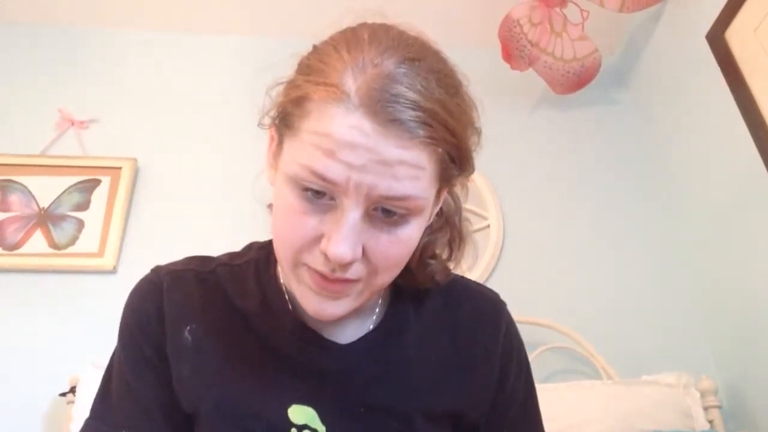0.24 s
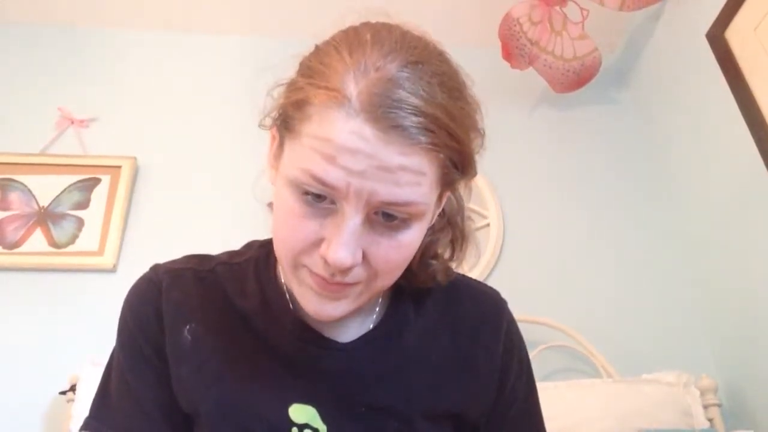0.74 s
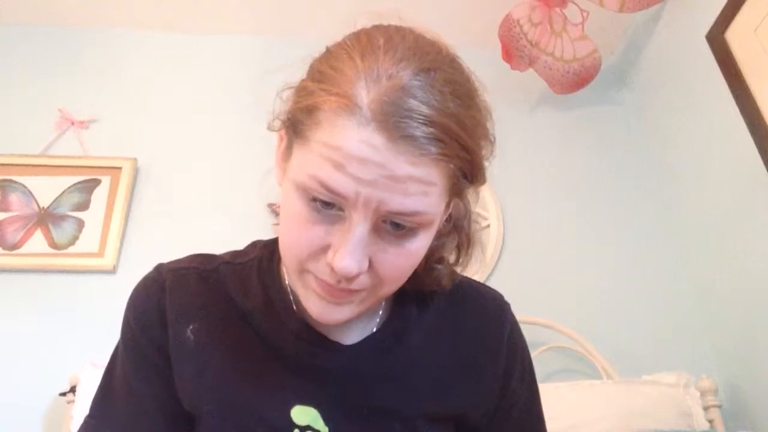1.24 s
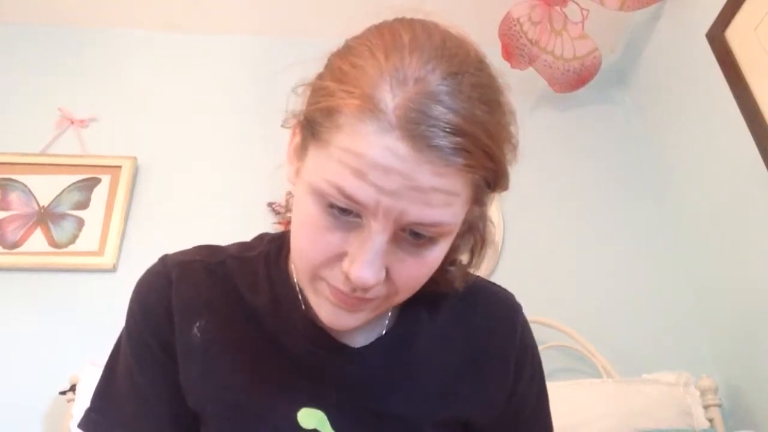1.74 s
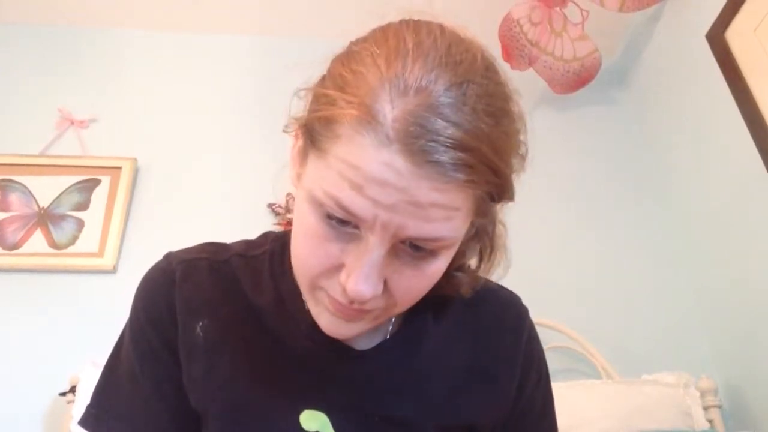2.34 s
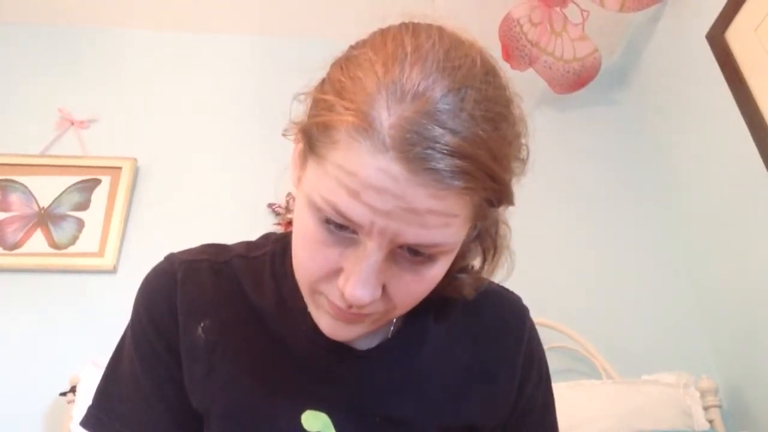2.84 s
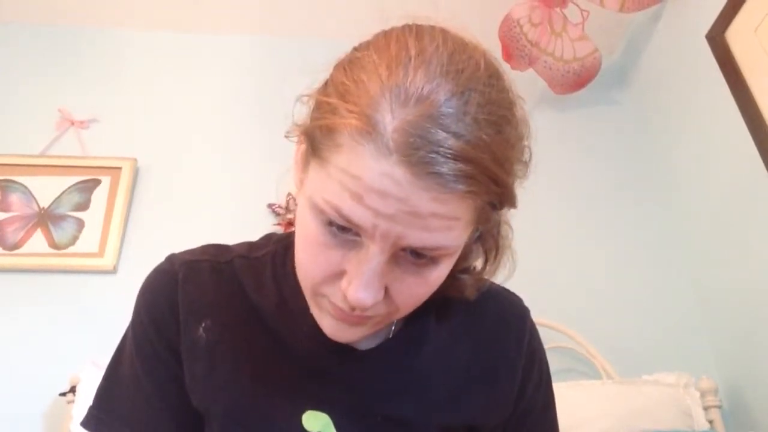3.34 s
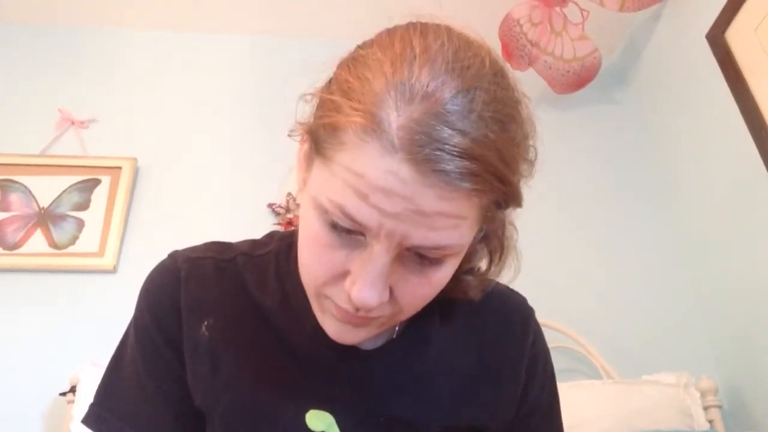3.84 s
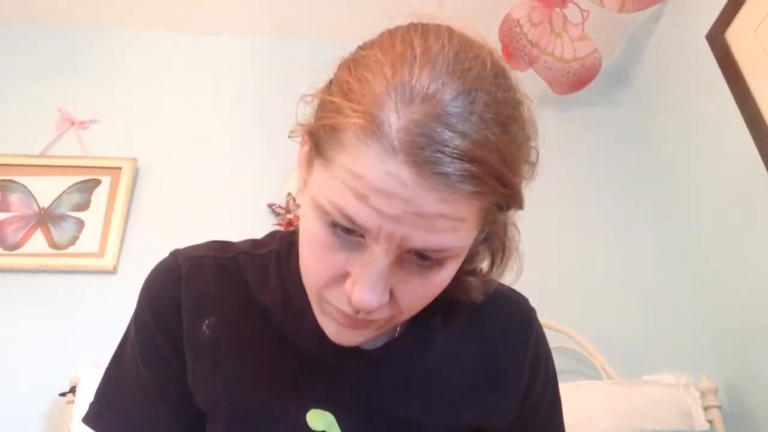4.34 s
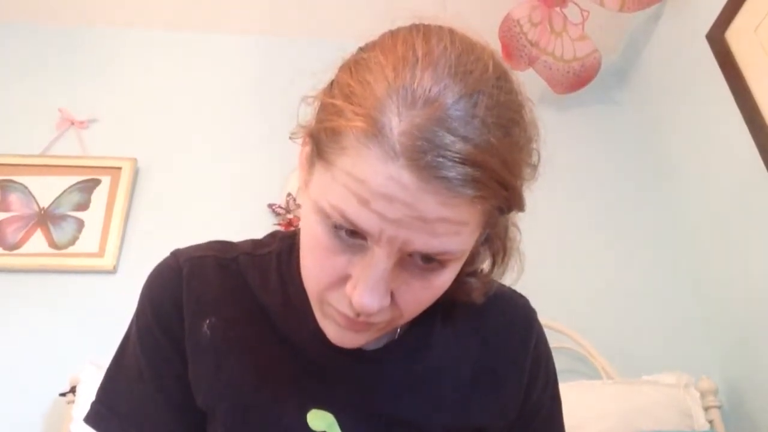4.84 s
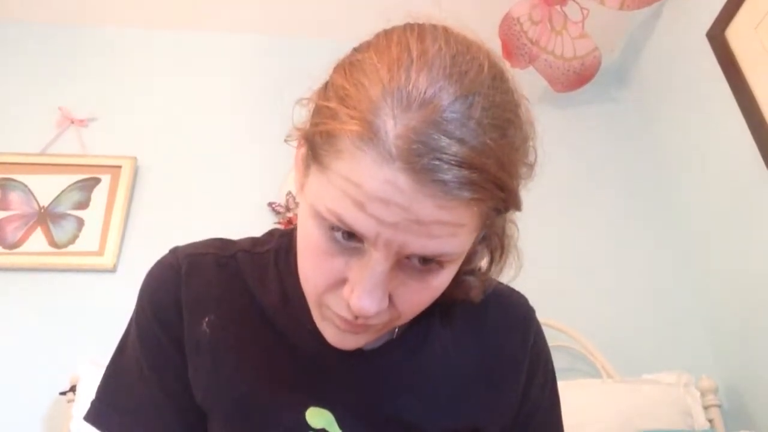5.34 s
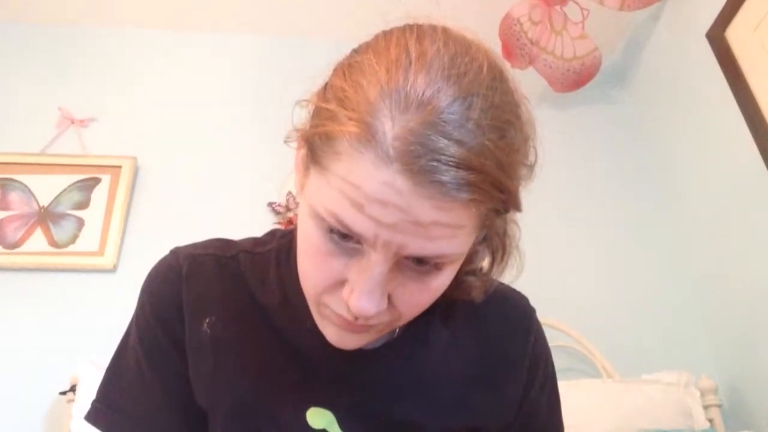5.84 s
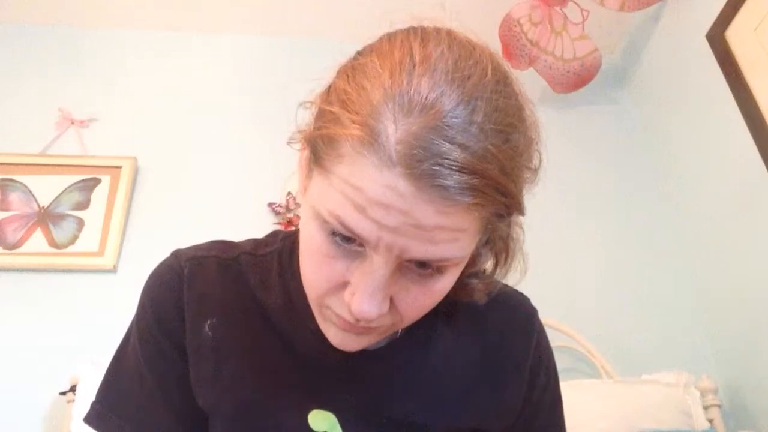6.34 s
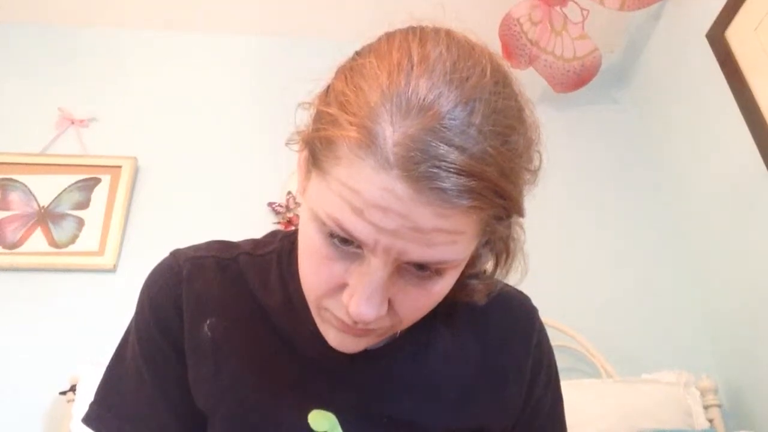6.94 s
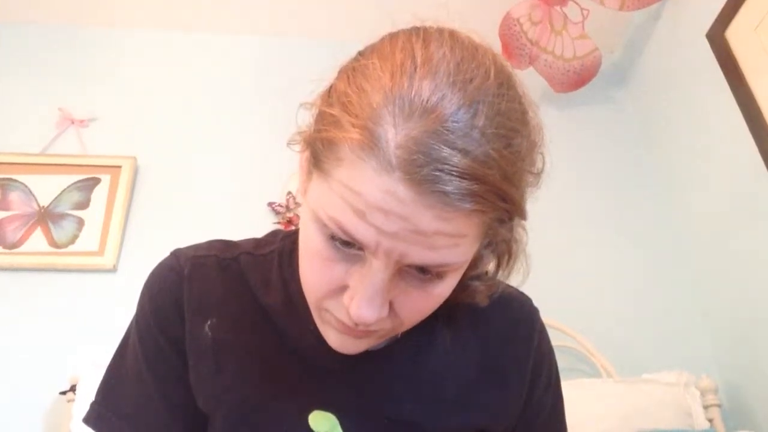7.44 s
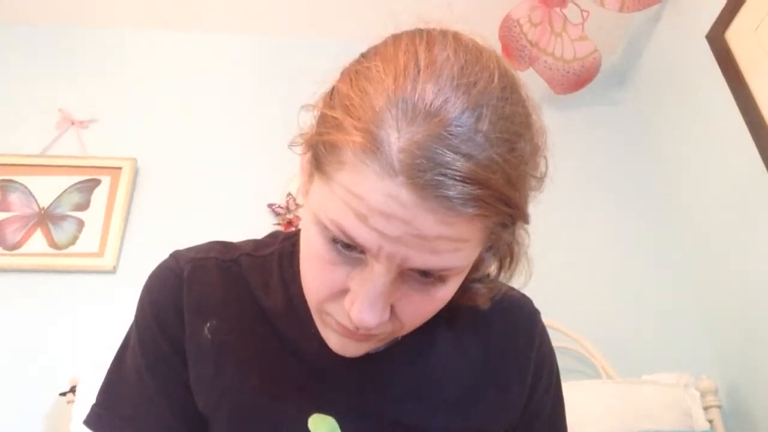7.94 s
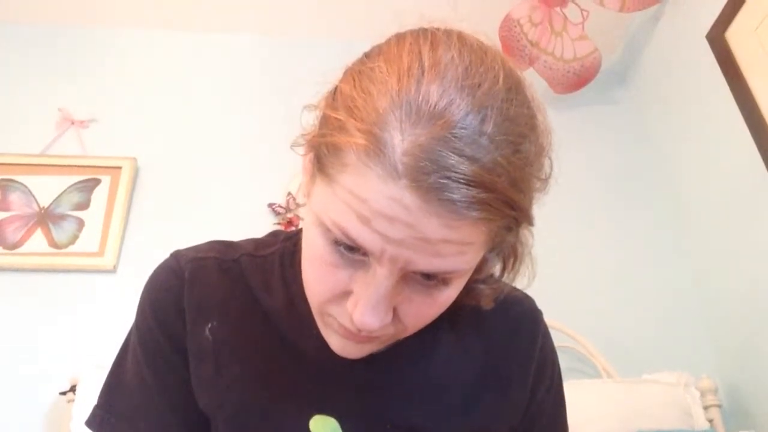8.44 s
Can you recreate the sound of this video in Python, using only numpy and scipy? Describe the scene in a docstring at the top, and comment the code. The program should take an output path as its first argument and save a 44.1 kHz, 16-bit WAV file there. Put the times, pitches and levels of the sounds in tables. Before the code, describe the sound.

In a quiet small room, a makeup brush makes a few short swishes, pauses, then dabs and swirls in a little plastic pot about eight times a second, with soft thuds, bristle hiss, ticks and tiny rim squeaks. The strokes stop, one hard plastic case clacks very loudly, something shifts on the desk, and the brushing resumes a little stronger. Close small microphone, faint steady hiss.

```python
"""A makeup brush is dabbed and swirled in a small plastic pot, about eight strokes a second, in a quiet small room.
Slip noise shaped by spectra makes the hiss of the bristles and the soft thuds; short rings make the ticks
of pot and tool; two resonances sing when the rim scrapes. Three longer sweeps fall in the first second.
In a pause one hard plastic case clacks loudly: a chattering crack plus ringing modes.
Echoes and a short tail answer the handling, over steady room air and microphone hiss."""
import sys
import numpy as np
from scipy import signal
from scipy.fft import rfft, irfft
from scipy.io import wavfile
from scipy.ndimage import uniform_filter1d

SR = 44100
rng = np.random.default_rng(int(sys.argv[2]) if len(sys.argv) > 2 else 0)


def transcribe(signal):
    """Save signal, clipped to [-1, 1], as a 16-bit WAV file at the path in sys.argv[1]."""
    frames = np.atleast_2d(signal).T
    limited = np.clip(frames, -1, 1)
    pcm = np.round(limited * 32767).astype(np.int16)
    wavfile.write(sys.argv[1], SR, pcm)


N = 383669
TIME = np.arange(N) / SR
TICK_S = 0.005  # span over which a tick has rms 1
CLACK_S, CLACK_DB = 5.9496, -12

# brush strokes: landing t/s, push length/s, force/dB, landing knock/dB
STROKES = [(0.037, .03, -65, -49.5), (.085, .015, -61, -69), (.621, 0.037, -62, -44.5),
           (1.62, .015, -61.5, -66), (1.71, .06, -62.5, -64), (1.849, 0.045, -64, -66),
           (1.995, .04, -65.5, -70), (2.089, 0.086, -65, -67), (2.24, .1, -64.5, -70),
           (2.382, .02, -55, -48.5), (2.502, 0.056, -61.5, -47), (2.618, 0.069, -65, -64),
           (2.785, 0.063, -58.5, -48.5), (2.898, 0.052, -55.5, -46), (3.034, .06, -57, -52),
           (3.152, .05, -55, -43), (3.276, 0.036, -60, -47.5), (3.393, 0.028, -54.5, -46),
           (3.522, 0.049, -60, -51), (3.655, .055, -56, -48), (3.781, .04, -58, -50),
           (3.893, 0.026, -56.5, -42.5), (4.027, 0.054, -64, -57), (4.155, 0.04, -55.5, -61),
           (4.28, .04, -59, -54), (4.397, .035, -55.5, -47), (4.527, .03, -60, -53.5),
           (4.628, 0.039, -56, -60), (4.756, .04, -57, -50), (4.862, 0.049, -57, -50.5),
           (4.985, .05, -56.5, -47.5), (5.088, 0.038, -59, -48.5), (5.216, .04, -59, -53),
           (5.325, .07, -55, -54), (5.45, 0.048, -58.5, -64), (5.556, 0.031, -58.5, -55),
           (5.65, 0.039, -66, -67), (5.715, 0.014, -64, -49.5), (6.555, 0.03, -65, -67),
           (6.67, .03, -63, -63), (6.811, .01, -65, -62), (6.914, 0.0076, -65, -59),
           (7.021, 0.0091, -65, -60), (7.048, 0.044, -58.5, -60), (7.181, .04, -57, -58),
           (7.325, 0.026, -55.5, -46.5), (7.447, .07, -51.5, -37), (7.615, 0.027, -54.5, -49),
           (7.748, .075, -55.5, -43), (7.917, 0.024, -61, -43.5), (8.035, 0.054, -52.5, -47),
           (8.185, 0.054, -57, -59), (8.352, 0.048, -53, -51), (8.505, 0.058, -57, -59.5),
           (8.665, 0.035, -53, -53)]
# spectrum of the tuft rubbing a surface: f/Hz, relative density/dB
RUB_SPECTRUM = [(100, -44.5), (450, -1), (650, 2.5), (900, -2.5), (1200, 4), (1700, 0.5), (2200, -3.5),
                (3000, -17.5), (3600, -8), (5000, -28), (15000, -47.5)]
# spectrum of bristle hiss and bright edges: f/Hz, relative density/dB
BRISTLE_SPECTRUM = [(100, -46.5), (1000, -2.5), (3000, 1.5), (4000, -1.5), (5500, -4), (8000, -3.5),
                    (10000, -1.5), (13000, -3), (15000, -5.5)]


def gain_of(db):
    """Decibels to amplitude."""
    return 10 ** (np.asarray(db) / 20)


def evened(x):
    """Scales to rms 1."""
    return x / np.sqrt(np.mean(x ** 2) + 1e-20)


def read(points, hz):
    """Interpolates a table on a log-frequency axis."""
    f, value = np.transpose(points)
    return np.interp(np.log(hz + 1), np.log(f + 1), value)


def add(mix, s, sound):
    """Mixes a sound in at time s."""
    part = mix[round(s * SR):][:len(sound)]
    part += sound[:len(part)]


def coloured(x, spectrum):
    """Filters a steady excitation of N samples by a spectrum, to rms 1."""
    hz = np.fft.rfftfreq(N, 1 / SR)
    return evened(irfft(rfft(x) * gain_of(read(spectrum, hz)), N))


def slips(per_s, spread_db, smooth, size=N):
    """Tiny stick-slip pulses of uneven size over a smooth rubbing noise."""
    sizes = gain_of(spread_db * np.minimum(rng.exponential(1, size), 3))
    signs = rng.choice([-1, 1], size)
    happens = rng.random(size) < per_s / SR
    pulses = evened(sizes * signs * happens)
    return evened(pulses + smooth * rng.standard_normal(size))


def friction(spectrum, per_s, spread_db, smooth):
    """Slips heard through a body that colours them."""
    return coloured(slips(per_s, spread_db, smooth), spectrum)


def chatter(length_s, rise_s=1e-5, size=1024):
    """A short burst of micro-contacts, its spectrum evened out, at unit energy."""
    t = TIME[1:size + 1]
    fade = np.exp(-t / length_s) * (1 - np.exp(-t / rise_s))
    burst = rng.standard_normal(size) * fade
    for _ in range(3):  # alternately flatten the spectrum and restore the fade
        z = rfft(burst)
        burst = irfft(z / (abs(z) + 1e-9), size) * np.sqrt(fade)
    return burst / np.linalg.norm(burst)


def tick(spectrum, uneven_db, size=2048):
    """Causal (minimum-phase) ring of one contact; each spot struck favours other resonances."""
    hz = np.fft.rfftfreq(size, 1 / SR)
    spot = evened(uniform_filter1d(rng.standard_normal(len(hz)), size=7))
    log_gain = np.log(gain_of(read(spectrum, hz) + uneven_db * spot))
    circle = np.concatenate([log_gain, log_gain[-2:0:-1]])
    ring = np.fft.ifft(np.exp(np.conj(signal.hilbert(circle)))).real
    return ring / np.linalg.norm(ring) * np.sqrt(TICK_S * SR)


def resonance(x, hz, width_hz):
    """A resonance with broad skirts, at rms 1."""
    b, a = signal.iirpeak(hz, hz / width_hz, fs=SR)
    return evened(signal.lfilter(b, a, x))


def pressure(times, rises, falls, levels_db):
    """Amplitude of a run of strokes, each swelling to its peak and letting go."""
    t, power = TIME[::32], 0
    for s, rise, fall, db in zip(times, rises, falls, levels_db):
        swell = np.exp(-((t - s) / np.where(t < s, rise, fall)) ** 2)
        power = power + (gain_of(db) * swell) ** 2
    return np.interp(TIME, t, np.sqrt(power))


def dabs():
    """The bristle tips touch first, then the tuft rubs the pot, then the push thuds through it."""
    # spectrum of the pot's soft thud: f/Hz, relative density/dB
    thud_spectrum = [(20, -40), (45, -27), (75, -11.5), (115, -3), (170, -1), (260, -11), (350, -3),
                     (480, -14.5), (700, -10.5), (1200, -16), (3000, -59)]
    # the grip shifts how force is shared: t/s, thud over rub/dB, bristle hiss over rub/dB
    grip_table = [(.1, 5, -13), (.6, 7.5, -16), (1.6, -9, -9.5), (2.2, -7, -1.5), (2.5, 1.5, -5),
                  (3.4, 2.5, -6), (5.3, 1, -5), (6.6, 3.5, -8), (7.1, 5.5, -5.5), (7.6, 4, -4.5),
                  (8.6, 0, -5)]
    # about a firm stroke, thud grows faster than the force and hiss slower (dB per dB)
    firm_db, thud_growth, hiss_growth = -58, 1.28, 0.6
    s, _, force_db, _ = np.transpose(STROKES)
    grip_s, thud_share_db, hiss_share_db = np.transpose(grip_table)
    over_firm_db = force_db - firm_db
    thud_db = firm_db + thud_growth * over_firm_db + np.interp(s, grip_s, thud_share_db)
    hiss_db = firm_db + hiss_growth * over_firm_db + np.interp(s, grip_s, hiss_share_db)
    hiss = friction(BRISTLE_SPECTRUM, per_s=3200, spread_db=6.5, smooth=0.64)
    hiss = hiss * pushes(hiss_db, lag_s=0.001, attack_s=0.024, release_s=0.037)
    rub = friction(RUB_SPECTRUM, per_s=600, spread_db=3.5, smooth=0.4)
    rub = rub * pushes(force_db, lag_s=0.0016, attack_s=0.0077, release_s=0.0133)
    thud = friction(thud_spectrum, per_s=460, spread_db=1.5, smooth=0.44)
    thud = thud * pushes(thud_db, lag_s=0.0093, attack_s=0.0096, release_s=0.017)
    return hiss + rub + thud


def pushes(levels_db, lag_s, attack_s, release_s):
    """Amplitude of all the strokes: each drags in, swells, holds while easing off, and lets go."""
    ease_db_per_s = -57
    lead_db, lead_s = -10, 0.033  # tips drag in ahead of the landing: level under the push, swell time
    t, power = TIME[::32], 0
    for (s, length_s, _, _), db in zip(STROKES, levels_db):
        age = t - s - lag_s
        early = np.minimum(age, 0)
        swell = np.maximum(np.exp(-(early / attack_s) ** 2), gain_of(lead_db) * np.exp(early / lead_s))
        release = np.exp(-np.maximum(age - length_s, 0) / release_s)
        eased_db = db + ease_db_per_s * np.clip(age, 0, length_s)
        power = power + (gain_of(eased_db) * swell * release) ** 2
    return np.interp(TIME, t, np.sqrt(power))


def taps(knock_s=0.001625, edge_s=0.0034):
    """Each tick is a damped knock of the pot with a bright, gritty edge."""
    # extra ticks of the tool on the pot: bounces, bright clicks at landings, separate taps:
    # t/s, knock/dB, sharp edge/dB
    extra_ticks = [(1.849, -72, -62), (2.8425, -46, -63), (3.059, -49.5, -70), (3.182, -47, -75),
                   (3.303, -48, -61), (4.3066, -45.5, -59), (4.9, -48.5, -66), (5.0456, -51, -56),
                   (5.3488, -50.5, -72), (5.4026, -52.5, -70), (6.9137, -60, -60), (7.0908, -62.5, -58),
                   (7.1733, -73, -46), (7.352, -59, -58), (7.4455, -50, -47), (7.4978, -44, -65),
                   (7.7878, -42.5, -54), (8.057, -43.5, -66), (8.3742, -46, -61)]
    # spectrum of the knocked pot: f/Hz, relative density/dB
    knock_spectrum = [(100, -22.5), (350, -4), (480, -4), (760, 2), (1020, -4), (1210, 7), (1400, -7.5),
                      (2030, 0), (2320, -25.5), (2570, -3.5), (3000, -25.5), (3800, -16.5), (5000, -33.5),
                      (15000, -28.5)]
    out = np.zeros(N)
    for s, knock_db, edge_db in list(extra_ticks) + contacts():
        knock = tick(knock_spectrum, uneven_db=2.6)
        edge = tick(BRISTLE_SPECTRUM, uneven_db=2.2)
        add(out, s, gain_of(knock_db) * np.convolve(knock, chatter(knock_s)))
        add(out, s, gain_of(edge_db) * np.convolve(edge, chatter(edge_s)))
    return out


def contacts(count=4):
    """A stroke lands, may bounce and catches at random: rows (t/s, knock/dB, edge/dB)."""
    edge_under_force_db = -9
    bounce_s, bounce_db = 0.026, -1  # after landing; against midway between knock and push
    # stray catches during the push: rate, knock and edge against force, scatter
    stray_per_s, stray_db, stray_edge_db, stray_spread_db = 25, -3, -8, 1.5
    rows = []
    for s, length_s, force_db, knock_db in STROKES:
        edge_db = force_db + edge_under_force_db
        rows.append((s, knock_db, edge_db))
        if length_s > bounce_s:  # the shortest dabs lift off first
            rows.append((s + bounce_s, (knock_db + force_db) / 2 + bounce_db, edge_db))
        draws = zip(rng.random(count), rng.random(count), rng.standard_normal(count))
        for chance, place, scatter in draws:
            if chance < stray_per_s * length_s / count:
                catch_db = force_db + stray_spread_db * scatter
                rows.append((s + place * length_s, catch_db + stray_db, catch_db + stray_edge_db))
    return rows


def scrapes(low_width_hz=320, high_width_hz=480, dust_db=-11.5, bottom_hz=900, top_hz=4400):
    """Quick slips on the rim sing in two resonances of the pot; the lower shifts with the grip."""
    # the tool slides on the rim: t/s, swell/s, level/dB, low resonance f/Hz
    rim_slides = [(1.771, 0.0087, -46.5, 1400), (2.268, .006, -55.5, 1890), (2.313, .009, -52, 1310),
                  (2.333, 0.0096, -50.5, 1400), (2.491, 0.0058, -52.5, 1194), (2.62, 0.0075, -49.5, 1490),
                  (2.851, 0.015, -48.5, 1310), (3.107, .011, -50, 1500), (3.617, 0.0078, -53.5, 1460),
                  (4.075, .008, -55, 1434), (4.123, .016, -52, 1360), (5.05, .022, -52.5, 1410),
                  (5.162, 0.0088, -53, 1200), (6.814, 0.0076, -55.5, 1440), (7.088, .004, -49.5, 1324),
                  (7.294, 0.0097, -54, 1530), (7.446, 0.0053, -42, 1180), (7.659, 0.0082, -48, 1285),
                  (7.982, .027, -45, 1280), (8.249, 0.0053, -51, 1245), (8.35, .02, -56, 1470)]
    rim_hz, rim_db = 3320, -7.5  # upper resonance, level against the lower
    out, t = np.zeros(N), np.arange(-SR // 10, SR // 10) / SR
    # a small pot radiates the middle range
    small_body = signal.butter(3, [bottom_hz, top_hz], "band", fs=SR, output="sos")
    for s, swell_s, db, low_hz in rim_slides:
        drive = signal.sosfilt(small_body, slips(per_s=1500, spread_db=2, smooth=0.6, size=len(t)))
        low = resonance(drive, low_hz, low_width_hz)
        high = gain_of(rim_db) * resonance(drive, rim_hz, high_width_hz)
        dust = gain_of(dust_db) * rng.standard_normal(len(t))
        swell = np.exp(-(t / swell_s) ** 2)
        add(out, s + t[0], gain_of(db) * swell * evened(low + high + dust))
    return out


def sweeps():
    """The whole tuft drags over a surface and flicks off: slip noise under smooth swells."""
    # long brush sweeps: t/s, rise/s, fall/s, level/dB
    sweep_table = [(0.063, 0.046, 0.019, -48.5), (0.38, 0.026, 0.0053, -54), (0.661, 0.028, 0.014, -48)]
    # spectrum of the dragging tuft: f/Hz, relative density/dB
    swish_spectrum = [(100, -12), (700, -16), (980, 1), (1150, -1), (1450, -11), (1680, 2.5), (1950, -17),
                      (2450, -9), (2950, -19), (3400, -11.5), (4500, -16.5), (8500, -21), (10000, -19.5),
                      (15000, -27)]
    swish = friction(swish_spectrum, per_s=1800, spread_db=0.0, smooth=0.82)
    return swish * pressure(*np.transpose(sweep_table))


def clack(chatter_s=0.0017):
    """Hard plastic cracks and chatters for a moment."""
    # spectrum of the crack: f/Hz, relative density/dB
    crack_spectrum = [(100, -43), (330, -12.5), (480, -13), (690, 6), (800, -18), (900, -3), (1080, -9.5),
                      (1300, 3), (1900, -2), (2300, -13), (3350, -6.5), (4650, -18.5), (5500, -14),
                      (15000, -26.5)]
    out = np.zeros(N)
    contact = chatter(chatter_s, rise_s=0.00059)
    add(out, CLACK_S, gain_of(CLACK_DB) * np.convolve(contact, tick(crack_spectrum, uneven_db=3.0)))
    return out


def case_ring(ring_db=-14, swell_s=0.0022):
    """The clack leaves the case and the desk under it ringing in decaying modes."""
    # modes of the case: f/Hz, level/dB, t60/s
    mode_table = [(213.6, -19.5, 0.32), (538, -1, 0.11), (620, -11, 0.13), (691, -2.5, 0.18), (853, 1, 0.1),
                  (962, -22, 0.052), (1217, -3, 0.073), (1214, -1.5, 0.11), (1396, -8, 0.071),
                  (1520, -11, 0.088), (1664, 1.5, 0.073), (1776, -1, .11), (2090, -11, 0.11),
                  (2200, -6.5, 0.035), (2795, -11, 0.16), (3590, -17.5, 0.079), (3820, -10, 0.14),
                  (4300, -19, 0.29)]
    out, t = np.zeros(N), TIME[:SR // 3]
    ring = np.zeros(len(t))
    for hz, db, t60 in mode_table:
        decay = np.exp(-np.log(1000) * t / t60)
        ring += gain_of(db) * decay * np.sin(2 * np.pi * (hz * t + rng.random()))
    add(out, CLACK_S, gain_of(CLACK_DB + ring_db) * ring * np.minimum(t / swell_s, 1))
    return out


def slides():
    """Things shift briefly on the desk: a dry rub with a little hiss."""
    # slides on the desk: t/s, rise/s, fall/s, rub/dB, hiss/dB
    slide_table = [(1.15, .02, .03, -90, -70.5), (6.068, 0.027, 0.021, -55.5, -60.5),
                   (6.18, 0.045, .025, -72, -69), (6.361, 0.0067, .011, -60.5, -80)]
    s, rise, fall, rub_db, hiss_db = np.transpose(slide_table)
    rub = friction(RUB_SPECTRUM, per_s=820, spread_db=4, smooth=0.74)
    hiss = friction(BRISTLE_SPECTRUM, per_s=670, spread_db=3, smooth=0.6)
    return rub * pressure(s, rise, fall, rub_db) + hiss * pressure(s, rise, fall, hiss_db)


def bumps():
    """Soft, dull contacts that wake one low mode only, a decaying sine."""
    # small bumps: t/s, f/Hz, t60/s, level/dB
    bump_table = [(1.112, 545, 0.026, -47.5), (2.096, 644, 0.048, -57)]
    out, t = np.zeros(N), TIME[:SR // 4]
    for s, hz, t60, db in bump_table:
        add(out, s, gain_of(db - 60 * t / t60) * np.sin(2 * np.pi * hz * t))
    return out


def room(x, tail_db=-15, build_s=0.0095):
    """A few echoes, smeared by the clutter they bounce off, then a short diffuse tail."""
    # desk, walls and ceiling, against the direct sound: delay t/s, level/dB
    echo_table = [(0.0103, -17), (0.019, -15.5), (0.0273, -15), (0.034, -20)]
    # decay of the tail: f/Hz, t60/s
    decay_table = [(120, 0.41), (500, 0.18), (1500, 0.14), (4000, 0.28), (12000, 0.28)]
    size = SR // 2
    hz, t, z = signal.stft(rng.standard_normal(size), SR, nperseg=256)
    decay = np.exp(-np.log(1000) * t / read(decay_table, hz)[:, None])
    tail = signal.istft(z * decay, SR, nperseg=256)[1][:size]
    tail = tail * (1 - np.exp(-(TIME[:size] / build_s) ** 2))
    response = gain_of(tail_db) * tail / np.linalg.norm(tail)
    response[0] += 1  # direct sound
    for s, db in echo_table:
        add(response, s, gain_of(db) * chatter(0.0027))
    return signal.fftconvolve(x, response / np.linalg.norm(response))[:N]


def floor(level_db=-65.5):
    """Steady room air and microphone hiss: coloured noise."""
    # spectrum of the floor: f/Hz, relative density/dB
    floor_spectrum = [(20, -34.5), (45, -25.5), (80, -16.5), (130, -6), (220, 0), (300, -4.5), (560, -7.5),
                      (1150, -4.5), (1700, -7.5), (2500, -14.5), (4500, -18.5), (10000, -18.5),
                      (15000, -21)]
    return gain_of(level_db) * coloured(rng.standard_normal(N), floor_spectrum)


def scene():
    """All the handling sounds in the room, plus the case's ring and the floor."""
    handling = dabs() + taps() + scrapes() + sweeps() + slides() + bumps() + clack()
    return (room(handling) + case_ring() + floor())[None]


def record(dry, bass_hz=60, top_hz=15400):
    """The small microphone drops the deep bass; then a steep low-pass limits the band."""
    thin = signal.sosfilt(signal.butter(2, bass_hz, "high", fs=SR, output="sos"), dry)
    low_pass = signal.firwin(511, top_hz, window=("kaiser", 9), fs=SR)
    return signal.oaconvolve(thin, low_pass[None], "same")


dry = scene()
out = record(dry)
transcribe(out)
```